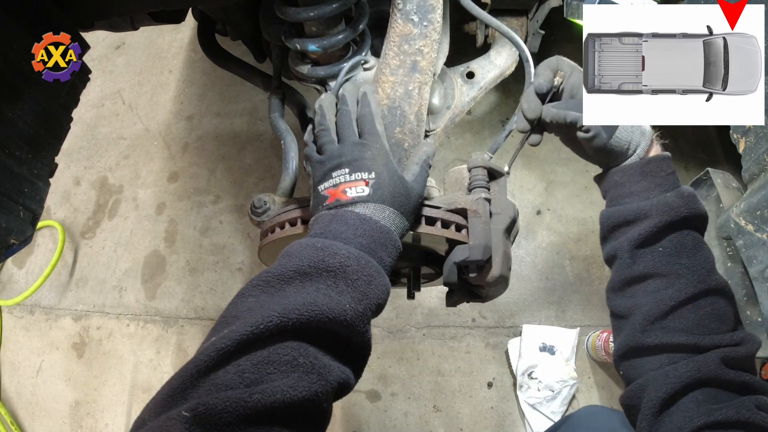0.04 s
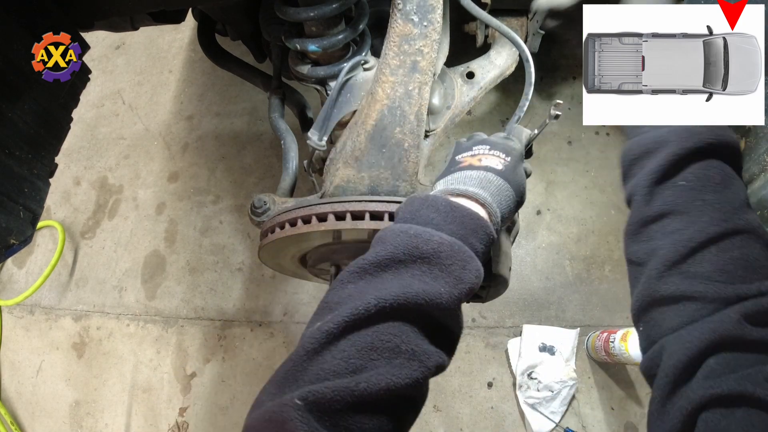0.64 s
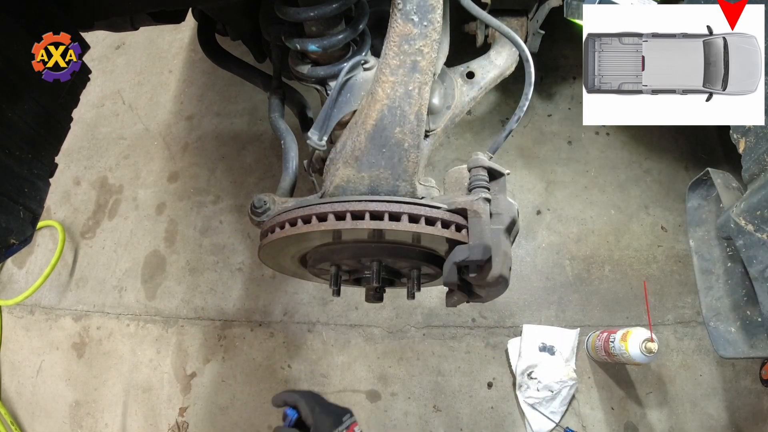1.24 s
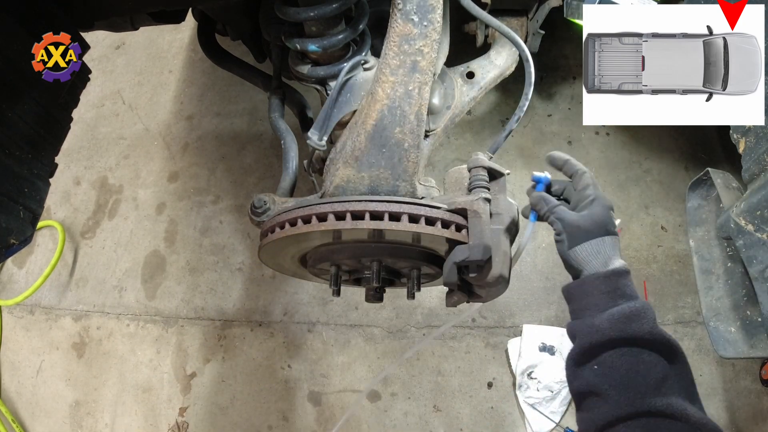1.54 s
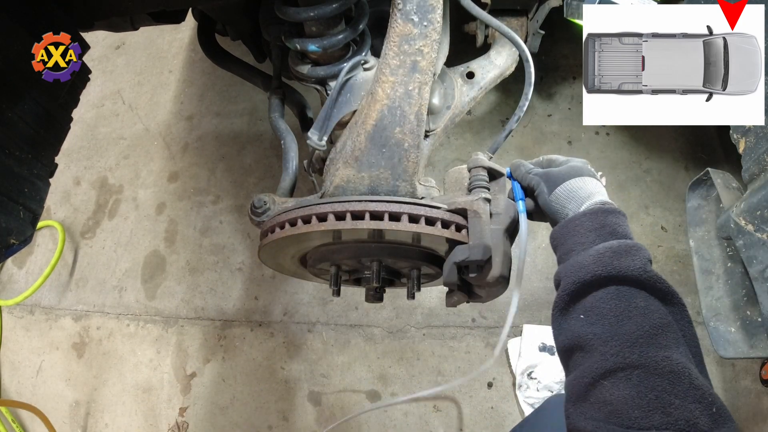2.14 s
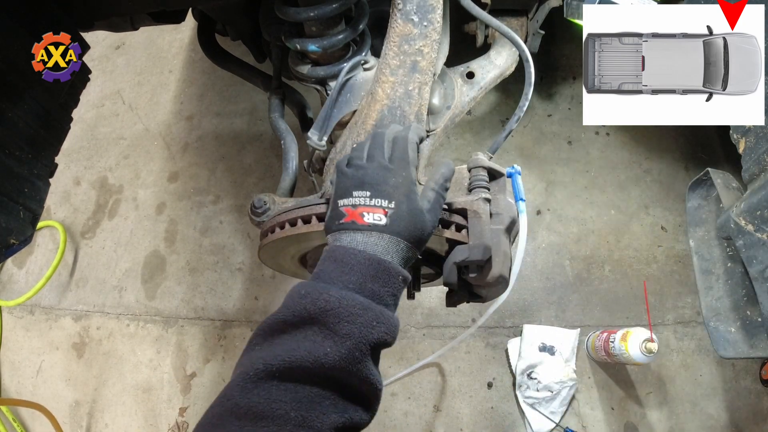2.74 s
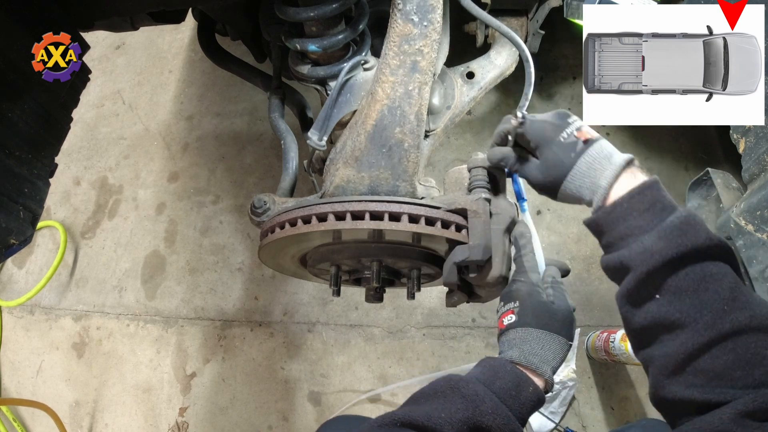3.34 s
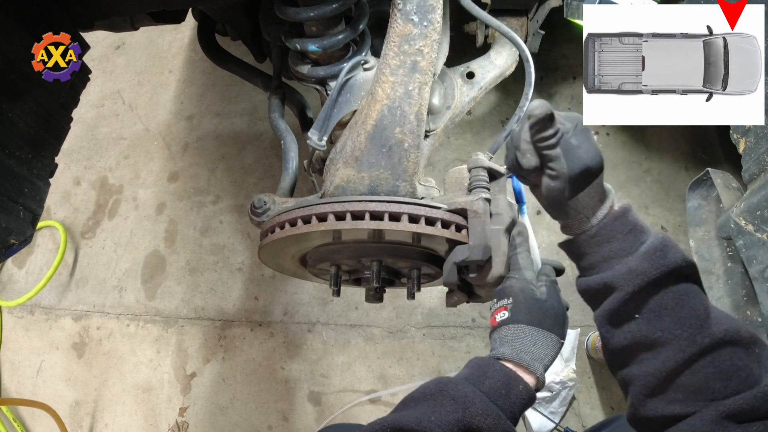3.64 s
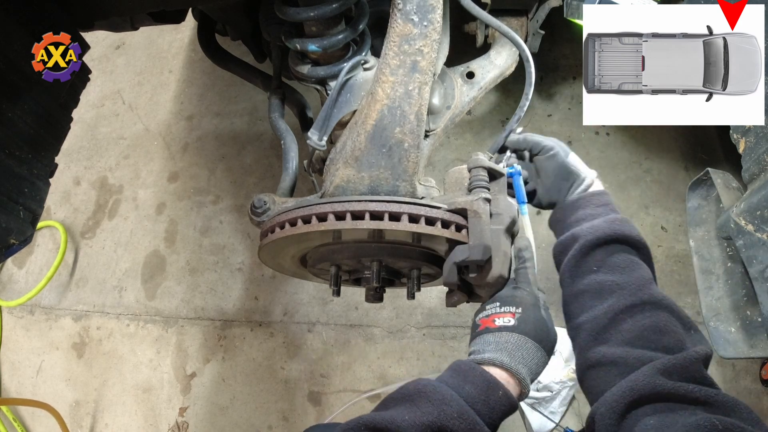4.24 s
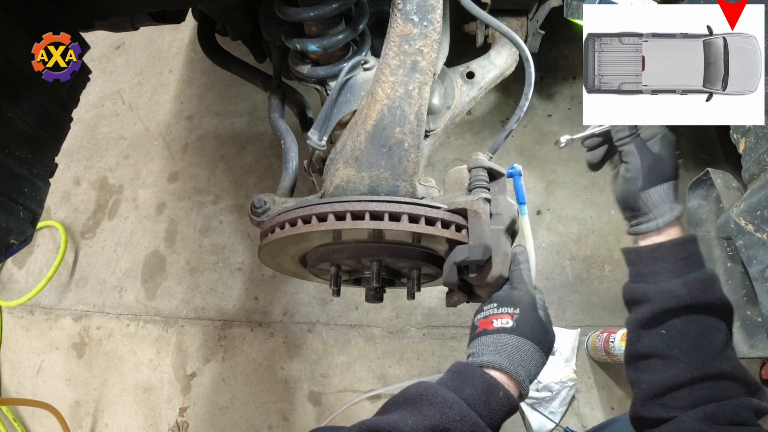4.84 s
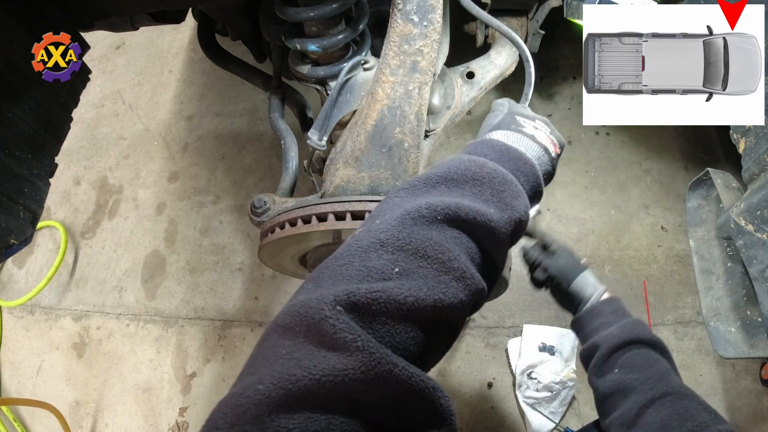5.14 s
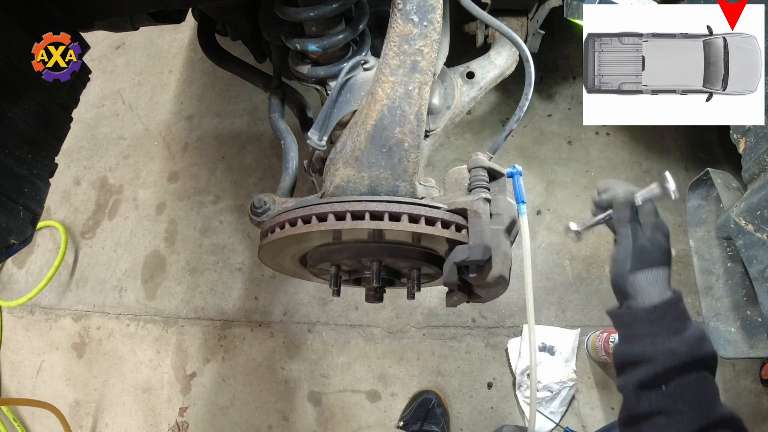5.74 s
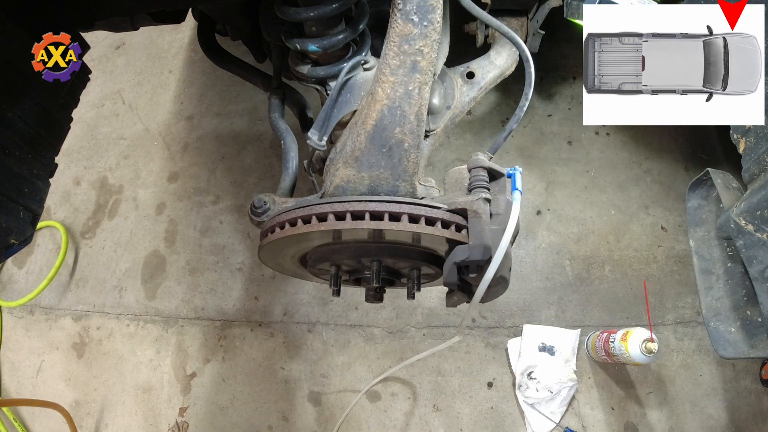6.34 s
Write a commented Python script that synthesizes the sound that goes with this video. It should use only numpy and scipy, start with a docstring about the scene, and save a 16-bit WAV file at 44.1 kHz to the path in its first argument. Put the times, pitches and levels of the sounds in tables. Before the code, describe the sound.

Gloved hands tap and rub a brake caliper, then an air-driven vacuum extractor hisses and draws fluid gurgling down a hose.

```python
"""In a garage, someone bleeds a brake. Gloved hands rub and knock on the caliper, a steel wrench clinks
and a hose brushes past. An air-driven vacuum extractor starts abruptly: its jet hisses and almost
whistles through a muffler. As the air pressure falls, the shrill top dies away and the hiss sinks.
While the bleeder screw is open, air and fluid rush down the hose, rumbling, gulping and fizzing."""
import sys
import numpy as np
from scipy import signal
from scipy.fft import rfft, irfft, next_fast_len
from scipy.io import wavfile

SR = 44100
rng = np.random.default_rng(int(sys.argv[2]) if len(sys.argv) > 2 else 0)


def file_out(sig):
    """Save sig as 16-bit WAV at sys.argv[1]."""
    # one column per channel
    cols = np.atleast_2d(sig).T
    # limit, then scale
    lim = np.clip(cols, -1, 1)
    pcm = np.round(lim * 32767).astype(np.int16)
    wavfile.write(sys.argv[1], SR, pcm)


N = 291060
T = np.arange(N) / SR
JET_ON_S, BLEEDER_OPEN_S, BLEEDER_SHUT_S = 2.311, 3.41, 6.27
LAG_MS, LAG_FROM_HZ = .12, 700   # the extractor is on the right: its treble reaches the left later


def from_db(db):
    """Turn decibels into a gain."""
    return 10 ** (np.asarray(db) / 20)

def rms_one(x):
    """Scale a sound to an average (rms) level of 1."""
    return x / np.sqrt(np.mean(x ** 2) + 1e-20)

def at_hz(points, hz):
    """Read between the rows of a table of pitches and values."""
    pitches, values = np.array(points).T
    return np.interp(np.log(hz + 1), np.log(pitches), values)

def opens(at_s, rise_s):
    """A smooth step from 0 to 1."""
    return .5 + .5 * np.tanh((T - at_s) / rise_s)

def swell(at_s, length_s):
    """A bell-shaped rise and fall."""
    return np.exp(-.5 * ((T - at_s) / length_s) ** 2)

def flutter(rate_hz, depth_db):
    """A gain that wavers at random."""
    knots = rng.standard_normal(4000)
    return from_db(depth_db * np.interp(T * rate_hz, np.arange(len(knots)), knots))

def ring(drive, hz, ring_s, phase=0):
    """One ringing pitch that fades by 60 dB in ring_s."""
    pole = from_db(-60 / (ring_s * SR)) * np.exp(2j * np.pi * hz / SR)
    return (signal.lfilter([1], [1, -pole], drive + 1e-18) * np.exp(1j * phase)).imag

def breathy_tone(hz, width_hz):
    """Noise keeps one pitch ringing."""
    band = signal.butter(1, [hz - width_hz, hz + width_hz], "band", fs=SR, output="sos")
    ring_s = np.log(1000) / (np.pi * width_hz)
    return rms_one(signal.sosfilt(band, ring(rng.standard_normal(N), hz, ring_s)))

def from_right(hz, lag_ms):
    """Left and right phase shifts that place a sound to the right."""
    return np.exp(-1j * np.pi * np.maximum(hz - LAG_FROM_HZ, 0) * lag_ms / 1000 * np.array([[1], [-1]]))

def add(out, start_s, sound):
    """Mix a sound in at start_s."""
    i = max(round(start_s * SR), 0)
    out[..., i:i + sound.shape[-1]] += sound[..., :N - i]

# How alike left and right sound: pitch_hz, likeness (0 to 1)
STEREO_LIKENESS = [(100, 1), (250, .998), (500, 0.87), (1000, 0.88), (2000, .74), (2700, 0.88),
                   (4000, 0.25), (8000, .15), (14000, .15)]
def noise(colour, peaks=(), lag_ms=0, band=(0, SR), size=N, diffuse=0):
    """Stereo noise shaped by colour (pitch_hz, level_db) and peaks, at level 1 within band."""
    n = next_fast_len(size)
    hz = np.arange(n // 2 + 1) * SR / n
    peaks_db = sum(lift / (1 + (2 * (hz - pitch) / width) ** 2) for pitch, width, lift in peaks)
    gain = from_db(at_hz(colour, hz) + peaks_db)
    alike = np.clip(at_hz(STEREO_LIKENESS, hz), 0, 1) * (1 - diffuse)
    direct, left, right = rfft(rng.standard_normal((3, n)))
    shared = np.sqrt(alike) * direct * from_right(hz, lag_ms)
    both = gain * (shared + np.sqrt(1 - alike) * np.array([left, right]))
    in_band = irfft(both.mean(0) * (hz > band[0]) * (hz < band[1]), n)
    return irfft(both, n)[:, :size] / in_band.std()


# The garage's background noise: pitch_hz, level_db
GARAGE_COLOUR = [(15, -30.5), (25, -4), (118, -4.5), (250, -13.5), (383, -12.5), (879, -23), (1000, -23.5),
                 (2700, -23.5), (6370, -37.5), (15000, -46)]
def garage_air(level_db=-77.5):
    """Faint, low noise fills the room."""
    return from_db(level_db) * noise(GARAGE_COLOUR, diffuse=.09)

# Spells of rubbing: start_s, end_s, level_db
GLOVE_RUBS = [(-.05, 0.025, -57), (.05, 0.613, -74.5), (.61, 0.884, -63), (0.898, 1.186, -63),
              (1.19, 1.55, -82.5), (1.77, 1.852, -80), (2.02, 2.35, -79.5)]
# The tone of the rubbing: pitch_hz, level_db
GLOVE_COLOUR = [(120, -40), (200, -8.5), (382, -5.5), (667, -14.5), (1460, -12), (1940, -15.5),
                (2840, -18.5), (5060, -25.5), (7830, -57), (8850, -46), (13000, -58)]
def rubbing(rise_s=.015, fall_s=.025):
    """Gloves and sleeves rub with a grainy rustle."""
    gain = sum(from_db(db) * opens(start, rise_s) * (1 - opens(end, fall_s))
               for start, end, db in GLOVE_RUBS)
    return gain * noise(GLOVE_COLOUR, diffuse=.15) * flutter(rate_hz=160, depth_db=3)

def leaning(level_db=-63.5, end_s=1.2, release_s=.07):
    """The suspension stirs under a leaning hand until it lets go."""
    stir = noise([(25, 0), (100, 6.5), (220, -3), (400, -18.5), (1000, -65)], diffuse=.015)
    return from_db(level_db) * stir * (1 - opens(end_s, release_s))

# Hard knocks on the caliper, plus the bright ticks of the wrench striking steel at 1.18 and 1.21 s: start_s,
# level_db, pitch_hz, treble_db
KNOCKS = [(0.007, -37.5, 2210, -13), (0.074, -40.5, 2380, -35), (0.104, -32.5, 510, -22),
          (0.179, -30, 620, -31), (0.227, -41, 960, -34), (0.457, -45.5, 520, -36),
          (0.54, -46, 2050, -15), (0.654, -30, 1390, -25), (0.752, -29.5, 1570, -24),
          (0.792, -29.5, 1110, -11.5), (0.84, -33.5, 457, -30), (1.065, -46.5, 2780, -30),
          (1.128, -43, 560, -36), (1.177, -37.5, 1206, 4), (1.208, -41.5, 1200, -15),
          (1.457, -52, 692, -26), (1.585, -53, 603, -33), (2.031, -49.5, 1100, -14),
          (2.074, -35.5, 830, -29)]
# The dull and bright parts of a touch: pitch_hz, level_db
DULL_COLOUR = [(150, 0.5), (400, 2.5), (1500, -3), (2800, -4.5), (4000, -10), (6000, -27), (12000, -52)]
BRIGHT_COLOUR = [(2000, -29), (4000, 7), (5500, -3.5), (7000, -9.5), (9700, -7), (12000, -15), (15000, -32)]
def taps(level_db=-7, tick_db=-3, lift_db=17, width_hz=520, rise_s=.0019, ring_s=.042):
    """Each knock gives a dull ring of the metal, a bright tick and a faint tail from the garage."""
    out, t = np.zeros((2, N)), T[:SR // 4]
    tail = from_db(-28 - 60 * t / .11)
    fade = (1 - np.exp(-(t / rise_s) ** 2)) * (from_db(-60 * t / ring_s) + tail)
    for start, db, hz, treble_db in KNOCKS:
        body = noise(DULL_COLOUR, [(hz, width_hz, lift_db), (2800, 300, 5)], size=len(t), diffuse=.12)
        tick = from_db(treble_db + tick_db) * noise(BRIGHT_COLOUR, size=len(t))
        add(out, start, from_db(db + level_db) * fade * (body + tick))
    return out

# The wrench touches steel: middle_s, level_db, length_s
WRENCH_SKIPS = [(0.009, -40.5, 0.0022), (0.179, -41, 0.0023), (1.18, 3, 0.0026), (1.196, 0.5, 0.005),
                (1.207, -0.5, 0.0049), (1.219, -2, 0.0018), (1.234, -10, 0.005), (1.248, -13, 0.0027)]
# Its ringing pitches: pitch_hz, level_db, ring_s, left_phase_rad
WRENCH_RINGS = [(2850, -17, .06, 1.8), (4662, -30, .07, 1), (5733, -11, .07, 0), (6578, -29, .11, .2),
                (9590, -7, .05, 2.2), (9643, -1, .055, 2.2), (10880, -5, .04, 1.4), (10930, -19, .17, 1.4),
                (12260, -23, .06, .2), (13990, -4, .06, 2), (14700, -18, .03, 1.5)]
def wrench(ring_db=-48, scrape_db=-65, build_s=.0036, echo_db=-25):
    """The wrench skips over steel; each skip scrapes and sets it ringing brightly."""
    contact = sum(from_db(db) * swell(at, length) for at, db, length in WRENCH_SKIPS)
    drive = contact * rng.standard_normal(N)
    rings = 0
    for hz, db, ring_s, phase in WRENCH_RINGS:
        built_up = ring(drive, hz, build_s)
        rings = rings + from_db(db) * rms_one(ring(built_up, hz, ring_s, np.array([[phase], [0]])))
    scrape = noise([(300, -10), (1200, -8), (3500, -14), (7500, -21.5), (10000, 8), (11800, -10.5),
                    (14500, 1), (15500, -25.5)])
    clink = from_db(ring_db) * rings + from_db(scrape_db) * rms_one(contact * scrape)
    return clink + from_db(echo_db) * garage_echo(clink)

def garage_echo(sound, ring_s=.13):
    """Many reflections die away, different on the left and right."""
    t = T[:SR // 3]
    echoes = rng.standard_normal((2, len(t))) * from_db(-60 * t / ring_s)
    return signal.fftconvolve(sound, echoes / np.linalg.norm(echoes[0]), axes=1)[:, :N]

# Hands bump the wheel hub: start_s, peak_db
HAND_BUMPS = [(0.103, -49), (0.177, -46.5), (0.347, -46.5), (0.424, -46), (0.452, -38.5), (0.656, -45.5),
              (0.713, -37), (0.756, -33.5), (0.791, -24.5), (0.817, -33), (0.841, -36), (2.071, -60)]
# The hub's low pitches: pitch_hz, level_db, ring_s
HUB_RINGS = [(41.4, -11, 0.15), (65.7, -10.5, 0.31), (107, -7, 0.076), (144.3, -8, 0.12),
             (180, -1.5, 0.042), (251, -6, 0.048), (334, -12, 0.022)]
def bumps(vary_db=2):
    """Soft blows make the hub and strut thud, a little differently each time."""
    out, t = np.zeros(N), T[:SR // 3]
    blow = 1.0 * (t == 0)
    for start, peak_db in HAND_BUMPS:
        thud = sum((-1) ** k * from_db(db + vary_db * rng.normal()) * ring(blow, hz, ring_s)
                   for k, (hz, db, ring_s) in enumerate(HUB_RINGS))
        add(out, start, from_db(peak_db) * thud / np.abs(thud).max())
    return out

# Small squeaks: middle_s, length_s, pitch_hz, level_db
METAL_SQUEAKS = [(0.27, 0.026, 1337, -64), (.675, 0.0088, 1140, -72), (0.963, 0.045, 382, -58.5),
                 (4.02, 0.03, 8220, -58), (6.502, 0.0061, 9320, -71)]
def squeaks(width_hz=55):
    """Glove and wrench squeak briefly on metal."""
    return sum(from_db(db) * swell(at, length) * breathy_tone(hz, width_hz)
               for at, length, hz, db in METAL_SQUEAKS)

# Light strokes: middle_s, length_s, level_db, pitch_hz, treble_db
STROKES = [(0.271, 0.019, -67, 4600, -17), (.619, 0.0091, -58.5, 1700, -8),
           (0.667, 0.022, -55.5, 1300, -22), (1.008, 0.011, -53, 1500, -19),
           (1.519, 0.019, -62.5, 750, -33), (1.924, 0.0087, -67.5, 2116, -21),
           (2.061, 0.015, -67.5, 1300, -5), (2.099, 0.016, -60, 900, -34), (2.148, 0.014, -72.5, 892, -5)]
def brushes(lift_db=7, width_hz=700):
    """Gloves and hose brush past in soft, grainy strokes."""
    out, t = np.zeros((2, N)), T[:SR // 4]
    for at, length, db, hz, treble_db in STROKES:
        body = noise(DULL_COLOUR, [(hz, width_hz, lift_db)], size=len(t))
        treble = from_db(treble_db) * noise(BRIGHT_COLOUR, size=len(t))
        bell = np.exp(-.5 * ((t - t.mean()) / length) ** 2)
        add(out, at - t.mean(), from_db(db) * bell * (body + treble))
    return out * flutter(rate_hz=250, depth_db=2)

def pressure_db(drop_db=10, middle_s=4.07, span_s=1):
    """The air supply holds at first, sags, then settles."""
    return -drop_db * opens(middle_s, span_s)

def shrill_gain(level_db, sag_db_per_s, holds_s, fall_db_per_s, bend_s=.054):
    """A shrill band sags gently for a while, then collapses."""
    age = np.maximum(T - JET_ON_S, 0)
    overdue = bend_s * np.logaddexp(0, (age - holds_s) / bend_s)
    return from_db(level_db - sag_db_per_s * age - fall_db_per_s * overdue)

# The exhaust's hiss, hollow body and three shrill bands: pitch_hz, level_db
HISS_COLOUR = [(1200, -34), (2000, -10.5), (2500, 2), (3000, -2.5), (3600, -7.5), (4400, -15.5),
               (5300, -22), (6300, -21.5), (8500, -31.5), (10000, -64), (15500, -61)]
BODY_COLOUR = [(25, -37), (80, -33.5), (300, -19.5), (500, -14), (750, -14), (1000, -3.5), (1400, 0.5),
               (1800, -2), (2200, -12.5), (3500, -32.5)]
SHRILL_LOW = [(4000, -25), (5400, -8.5), (6400, -11), (6900, -5.5), (7300, -19), (7900, 3), (8800, -3.5),
              (10000, -4.5), (12000, -56)]
SHRILL_MID = [(7500, -52), (8800, -18), (10000, -1), (11000, 1.5), (12200, -9.5), (13000, -7.5),
              (14500, -9.5), (15400, -26)]
SHRILL_HIGH = [(10500, -40), (13000, 0), (14500, -2), (15400, -15)]
# Pitches that the muffler and nozzle boost: pitch_hz, width_hz, lift_db
MUFFLER_PEAKS = [(1030, 210, 3.5), (1367, 140, 7), (1850, 76, 3), (2197, 99, 7), (2510, 205, 6),
                 (2706, 105, 7.5), (2863, 146, 6.5), (3224, 70, 7), (3740, 180, 4), (4960, 220, 8)]
NOZZLE_PEAKS = [(6870, 220, 11), (8050, 450, 4), (9370, 190, 6), (9960, 130, 7), (10490, 180, 8),
                (10840, 120, 9), (11330, 120, 6), (11620, 60, 6), (12800, 160, 6), (13190, 140, 5),
                (14350, 240, 4)]
def extractor(hiss_db=-37, body_db=-43.5, spurt_db=-39, spurt_s=.23):
    """The air jet spurts, then hisses through the muffler; its shrill bands die away one by one."""
    hiss = noise(HISS_COLOUR, MUFFLER_PEAKS, LAG_MS, band=(2300, 3000))
    hiss *= from_db(hiss_db + pressure_db())
    body = noise(BODY_COLOUR, MUFFLER_PEAKS, LAG_MS, band=(1200, 1600))
    body *= from_db(body_db + .81 * pressure_db() + 2 * bleeder())   # louder while fluid is drawn
    mid = noise(SHRILL_MID, NOZZLE_PEAKS, band=(9500, 12000))
    mid *= shrill_gain(level_db=-35.5, sag_db_per_s=5.5, holds_s=.74, fall_db_per_s=51)
    low = noise(SHRILL_LOW, NOZZLE_PEAKS, band=(7700, 8400))
    low *= shrill_gain(level_db=-53.5, sag_db_per_s=2.5, holds_s=.99, fall_db_per_s=29)
    high = noise(SHRILL_HIGH, NOZZLE_PEAKS)
    high *= shrill_gain(level_db=-55.5, sag_db_per_s=2, holds_s=.9, fall_db_per_s=22)
    spurt = noise([(500, -43), (1800, -13), (2450, -1), (2950, -15), (3220, 1), (3800, -7.5),
                   (4600, -22), (9000, -45)], lag_ms=LAG_MS)
    spurt *= from_db(spurt_db) * np.exp(-np.abs(T - JET_ON_S) / spurt_s)
    jet = hiss + body + low + mid + high + spurt
    return jet * flutter(rate_hz=90, depth_db=1.06) * opens(JET_ON_S, .0021)

def whistle(level_db=-45, pitch_hz=2700, glide_hz=330, glide_s=.1, lift_db=7):
    """The muffler almost whistles, sliding up as the jet builds, loudest as the pressure starts to sag."""
    flat_by_hz = glide_hz * np.exp(-np.abs(T - JET_ON_S) / glide_s)
    tone = signal.hilbert(breathy_tone(pitch_hz, width_hz=40))
    tone *= np.exp(-2j * np.pi * np.cumsum(flat_by_hz) / SR)
    stereo = (tone * from_right(pitch_hz, LAG_MS)).real
    gain = from_db(level_db + pressure_db() + lift_db * swell(at_s=3.6, length_s=.35))
    return gain * stereo * flutter(rate_hz=7, depth_db=3) * opens(JET_ON_S, .0031)

def bleeder():
    """How far the bleeder screw is open, 0 to 1."""
    return opens(BLEEDER_OPEN_S, .011) * (1 - opens(BLEEDER_SHUT_S, .0043))

# The churning flow and the fizz of air through the fluid: pitch_hz, level_db
CHURN_COLOUR = [(20, -4.5), (60, 1.5), (120, -0.5), (200, 1.5), (270, -6.5), (360, -13.5), (520, -11),
                (830, -10), (1120, -5), (1600, -26.5), (2200, -10), (3200, -16.5), (5000, -22),
                (10000, -45), (15500, -38)]
FIZZ_COLOUR = [(3000, -25), (7000, 5), (11000, -3), (15500, -2)]
# The pitch that the hose fitting boosts: pitch_hz, width_hz, lift_db
FITTING_PEAK = [(5060, 210, 4.5)]
# Gulps in the hose: middle_s, length_s, pitch_hz, level_db
HOSE_GULPS = [(3.433, 0.0087, 928, -39), (3.588, 0.043, 973, -47.5), (4.292, .04, 973, -43.5),
              (5.242, 0.052, 978, -42), (5.69, .12, 706, -46), (6.147, .08, 700, -54.5)]
def suction(churn_db=-42, fizz_db=-64, flow_sag_db_per_s=1.03, fizz_sag_db_per_s=4):
    """Air and fluid churn, gulp and fizz down the hose, sounding two hollow tones as the flow weakens."""
    open_s = T - BLEEDER_OPEN_S
    churn = from_db(churn_db) * noise(CHURN_COLOUR, FITTING_PEAK, LAG_MS, band=(30, 300))
    handover = opens(at_s=5.54, rise_s=.15)   # the upper tone gives way to the lower
    upper = from_db(-46 - 10 * handover) * breathy_tone(hz=973, width_hz=72)
    lower = from_db(-52.5 + 4.5 * handover) * breathy_tone(hz=700, width_hz=92)
    flow = from_db(-flow_sag_db_per_s * open_s) * (churn + upper + lower)
    fizz = from_db(fizz_db - fizz_sag_db_per_s * open_s) * noise(FIZZ_COLOUR)
    gulps = sum(from_db(db) * swell(at, length) * breathy_tone(hz, width_hz=65)
                for at, length, hz, db in HOSE_GULPS)
    return (flow + gulps + fizz) * flutter(rate_hz=77, depth_db=.5) * bleeder()

def scene():
    """Hands, extractor and hose over the faint air of the garage."""
    hands = taps() + brushes() + bumps() + wrench() + rubbing() + leaning() + squeaks()
    return hands + extractor() + whistle() + suction() + garage_air()

def record(dry):
    """Cut the treble steeply above 15800 Hz."""
    return signal.sosfilt(signal.ellip(12, .1, 80, 15800, fs=SR, output="sos"), dry)


dry = scene()
out = record(dry)
file_out(out)
```